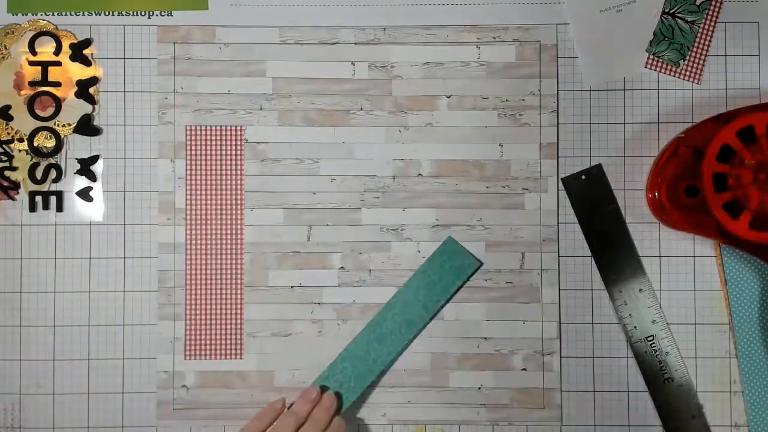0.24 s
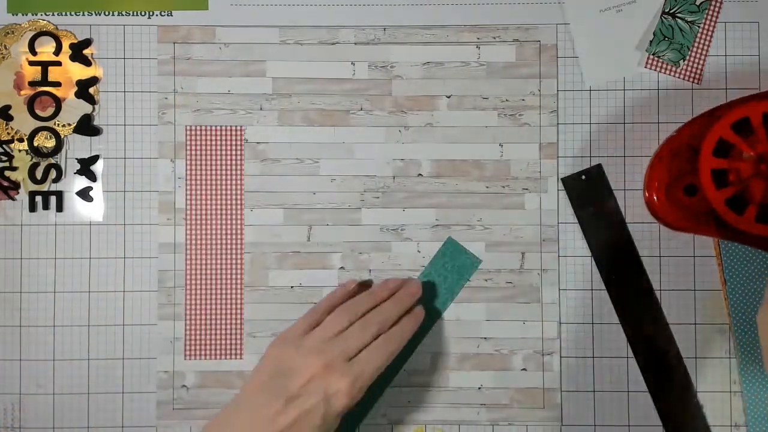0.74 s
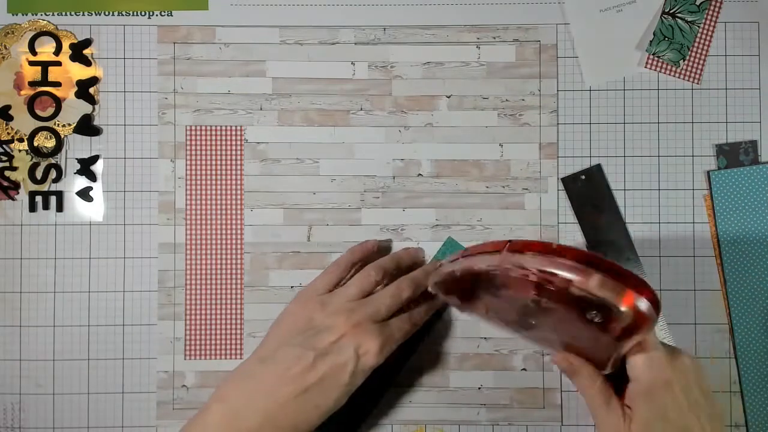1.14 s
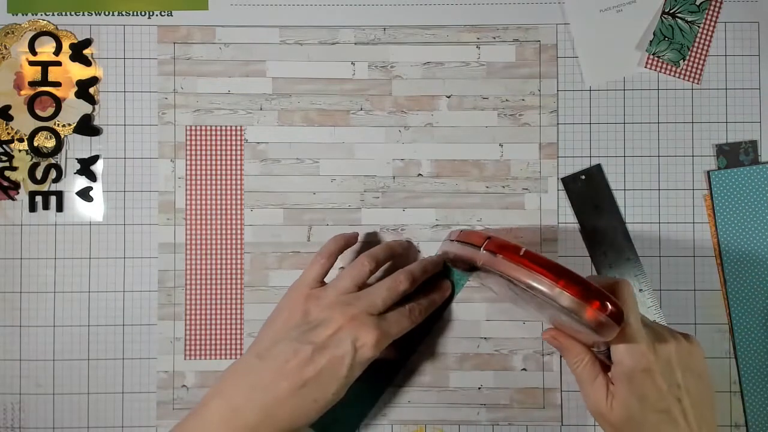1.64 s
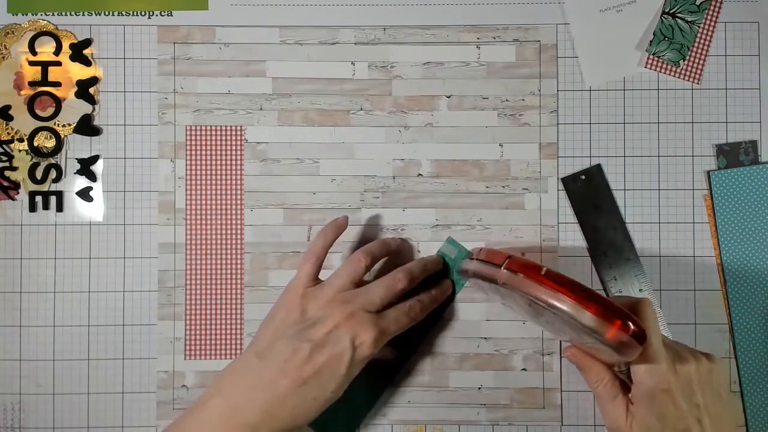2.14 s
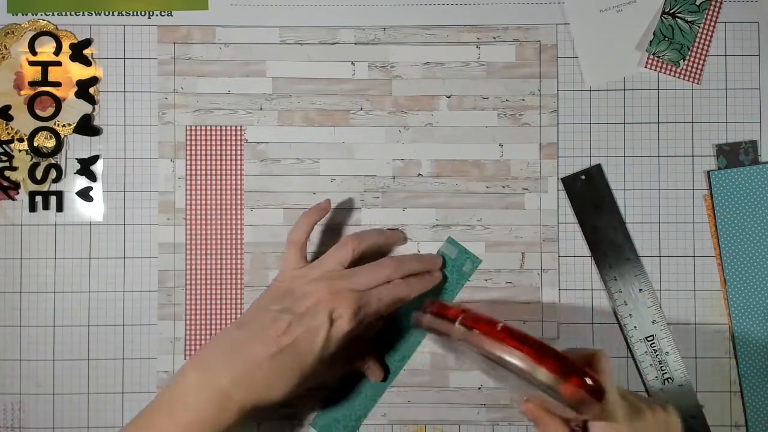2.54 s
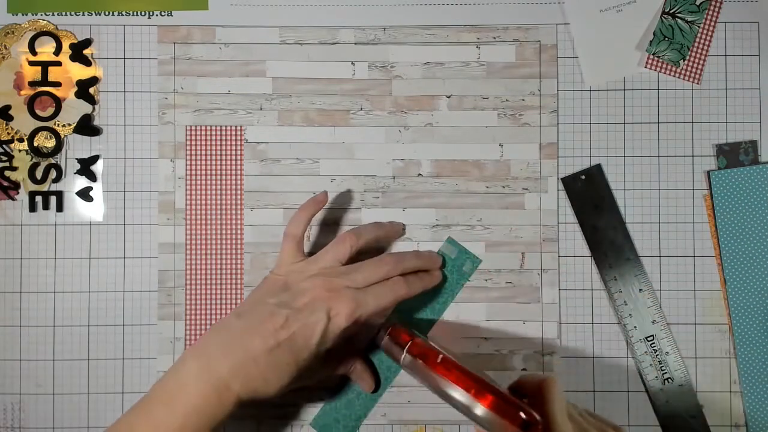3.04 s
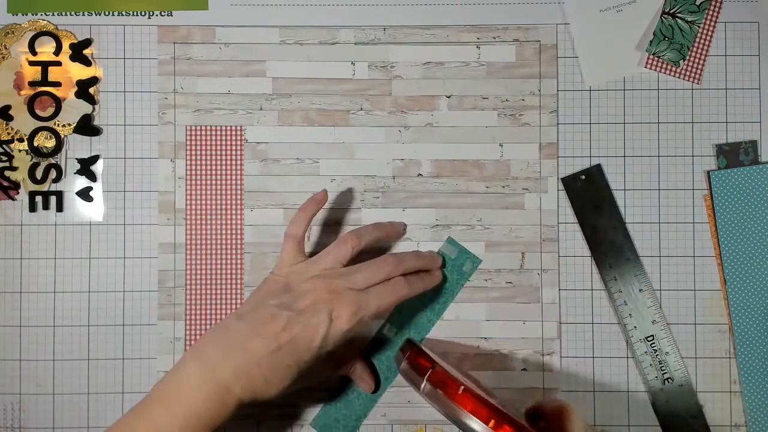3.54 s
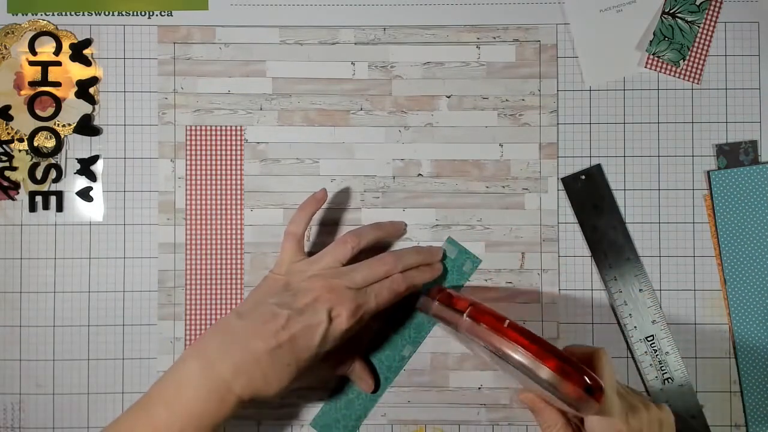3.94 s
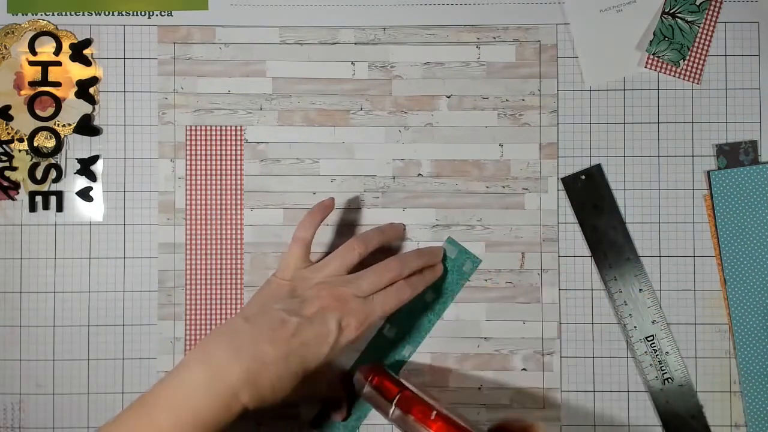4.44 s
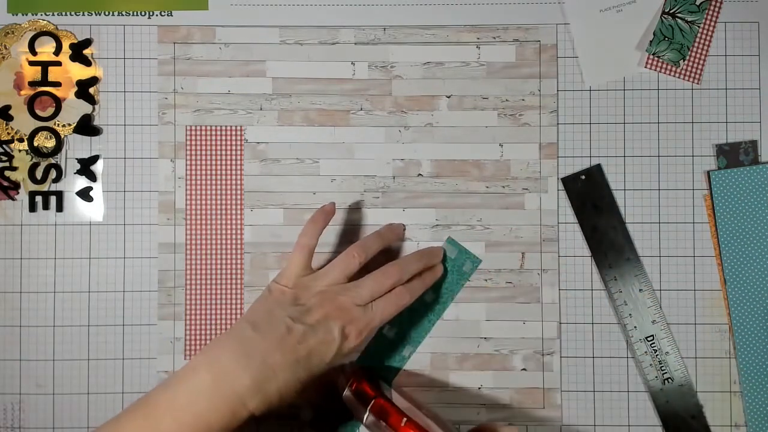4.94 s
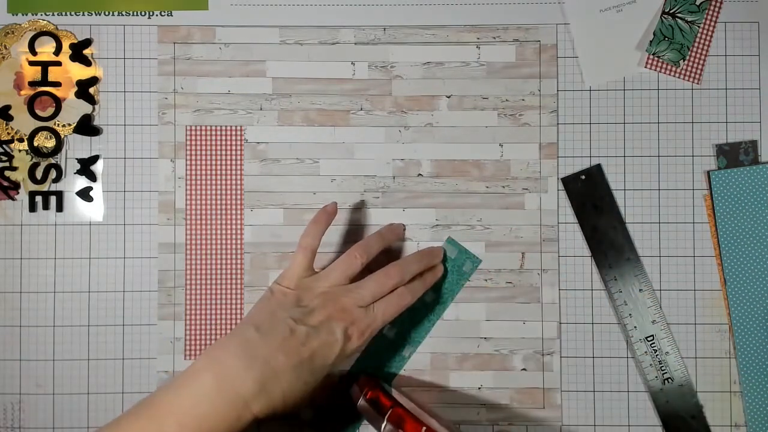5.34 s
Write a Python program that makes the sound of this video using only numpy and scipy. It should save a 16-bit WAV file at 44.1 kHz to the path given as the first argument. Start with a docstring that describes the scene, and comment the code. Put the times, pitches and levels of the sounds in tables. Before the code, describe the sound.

Close up in a small quiet room, a handheld tape runner is lifted with a rustle and a scatter of light plastic knocks. After a brief lull it is pushed over paper several times, each stroke giving a short cluster of sharp clicks and a soft thud on the table. Paper slides faintly between strokes, and everything has a slightly hollow colour.

```python
"""A rustle and light plastic knocks, close by: a tape runner is picked up from a craft table.
It is pressed along a paper strip in short strokes. Its ratchet snaps in bursts, the hollow shell
knocks and creaks, and paper slides. A small quiet room, in mono. Everything is heard twice,
the stronger copy 2.9 ms later, giving a hollow, comb-like colour."""
import sys
import numpy as np
from scipy import signal
from scipy.fft import rfft, irfft, next_fast_len
from scipy.io import wavfile
from scipy.ndimage import uniform_filter1d

SR = 44100
rng = np.random.default_rng(int(sys.argv[2]) if len(sys.argv) > 2 else 0)


def log_audio(samples):
    """Write samples as a 16-bit WAV file to the path given in sys.argv[1]."""
    # one column per channel
    frames = np.atleast_2d(samples).T
    # limit to full scale, then quantise
    limited = np.clip(frames, -1, 1)
    pcm = np.round(limited * 32767).astype(np.int16)
    wavfile.write(sys.argv[1], SR, pcm)


N = 246959
SIZE = 8192  # samples a blow may ring

# Modes of the plastic shell, its hollow and its bright crack. Each row: pitch in Hz, width in Hz, dB.
SHELL_MODES = [(1553, 430, 3.5), (1891, 230, -1.7), (2043, 530, -0.35), (2468, 230, -2.5),
               (2791, 530, 0.74), (3320, 380, 0), (3998, 1100, -1.5)]
HOLLOW_MODES = [(237, 77, -2), (333, 100, 2), (499.6, 130, 2.5), (658, 80, -6.5), (821.4, 160, -2),
                (1004, 88, -1.5), (1180, 190, -2)]
CRACK_MODES = [(3485, 300, -11.5), (4814, 2700, 0), (5050, 91, -5.5), (6000, 4800, -1.5), (9030, 9900, -7),
               (12750, 4900, -4.5)]
# Diffuse tails after high, middle and low modes. Each row: level in dB, time to fall 60 dB in ms.
TAILS = [(-33, 124), (-24.5, 83.5), (-30, 110.4)]
HIGH_TAIL, MID_TAIL, LOW_TAIL = TAILS


def ratchet():
    """Each sharp snap also rings the shell and its hollow; the hollow feels the longest push."""
    # Each row: start in seconds, contact in ms, level in dB.
    snaps = [(1.8113, 2.5, -18), (1.8253, 5, -21.5), (1.84, 5.5, -17.5), (1.8503, 3.2, -22),
             (1.8694, 3.5, -15.5), (1.8815, 0.54, -24), (2.234, 4.2, -22.5), (2.2563, 2.5, -15.5),
             (2.2729, 4.8, -22.5), (2.2856, 0.54, -10), (2.2988, .8, -9), (2.3067, 0.62, -19),
             (2.3136, 2.4, -33.5), (3.032, 3, -20), (3.0468, 2.3, -24), (3.0594, 1.6, -18),
             (3.0688, 3.8, -22), (3.0833, 1.7, -17.5), (3.6249, 2.2, -20), (4.12, 2.2, -16),
             (4.1385, 0.81, -16), (4.1507, 3.7, -18), (4.1628, 2, -20), (4.1693, 1.2, -26.5),
             (5.4582, 0.98, -30), (5.463, 0.96, -15), (5.4759, 1.7, -18.5), (5.4907, 5, -19.5),
             (5.4988, 3.2, -20)]
    # The ring of a snap. Each row: pitch in Hz, width in Hz, level in dB.
    snap_modes = [(4000, 1500, -8.5), (4684, 600, -5.5), (5374, 1200, 0), (6040, 1000, -3),
                  (7060, 2300, -6.5), (9400, 4700, -8), (11070, 3600, -10.5), (14500, 3000, -15.5)]
    out = np.zeros(N)
    for start, ms, db in snaps:
        body_db = 0.09 * (ms - 1)  # longer contacts pass more to the body
        strike(out, start, db, ms, snap_modes, HIGH_TAIL, grit_db=5)
        strike(out, start, body_db - 32, 0.44 * ms, SHELL_MODES, MID_TAIL, grit_db=2.7)
        strike(out, start, body_db - 37.5, 2.4 * ms, HOLLOW_MODES, LOW_TAIL,
               grit_db=5, peak_hz=880, db_per_octave=11)
    return out


def shell_knocks():
    """The tool knocks in the hand and on the paper: a crack, a ring, then a looser, softer bounce."""
    # Each row: start in seconds, crack, shell and hollow levels in dB, hollow peak in Hz.
    knocks = [(0.1148, -40, -33.5, -48.5, 660), (0.2069, -39.5, -47, -46.5, 1060),
              (0.2161, -52, -51.5, -42.5, 970), (0.2559, -34.5, -31.5, -45, 990),
              (0.2632, -19.5, -23.5, -37, 1080), (0.38, -59.5, -59, -82, 910), (0.417, -65, -61, -70, 900),
              (0.468, -54, -53, -60, 1200), (0.491, -63, -55, -61, 900), (0.5456, -56, -41, -39.5, 850),
              (0.5562, -47.5, -45, -44, 810), (0.5833, -40, -37.5, -48, 620), (0.614, -58, -38.5, -44, 850),
              (0.6523, -45.5, -34.5, -34.5, 776), (0.6826, -39.5, -32, -37, 850),
              (0.7011, -64, -56, -43, 850), (0.7279, -56, -44, -38, 850), (0.7392, -57, -39, -55, 920),
              (0.803, -57.5, -42.5, -53.5, 870), (0.8448, -76, -49, -50, 910),
              (0.8913, -39.5, -25, -27.5, 924), (0.918, -50.5, -70, -44, 840),
              (0.9622, -34.5, -37.5, -28.5, 820), (1.0018, -51, -42, -58, 860),
              (1.0113, -62, -61, -39, 825), (1.0501, -46, -44, -39, 826), (1.102, -60, -50.5, -52.5, 766),
              (1.1928, -67, -64, -49, 618), (1.2169, -77.5, -61.5, -48, 534),
              (1.246, -74, -64.5, -52.5, 616), (1.6679, -50, -51.5, -49.5, 715),
              (1.6808, -58, -48, -42.5, 684), (1.6903, -55.5, -54, -39.5, 660),
              (1.7875, -60, -40, -37, 714), (1.797, -35, -45.5, -45, 700), (1.9269, -60, -54, -47.5, 604),
              (2.0539, -43.5, -71, -70, 493), (2.113, -65.5, -55.5, -51, 426),
              (2.2989, -29.5, -29, -41.5, 820), (2.681, -64, -65.5, -41.5, 1000),
              (2.7175, -72, -85, -52, 962), (2.8812, -33.5, -46.5, -43.5, 1000),
              (2.987, -56.5, -52.5, -62.5, 890), (3.013, -47, -56, -52, 800),
              (3.0813, -53, -36, -25.5, 645), (3.1329, -60, -59, -50.5, 810), (3.17, -62, -60, -52, 970),
              (3.2816, -46, -47.5, -34.5, 589), (3.2928, -49.5, -38.5, -33, 912),
              (3.3038, -44, -42.5, -36, 924), (3.3674, -55, -56.5, -45.5, 950),
              (3.4428, -80, -86, -60, 680), (3.557, -61, -71, -70, 596), (3.574, -48, -57, -58, 555),
              (3.6514, -22, -28, -21.5, 635), (3.6643, -66, -67, -42, 670), (3.695, -69, -73, -47, 527),
              (3.7189, -66, -54, -47.5, 820), (3.748, -58.5, -58.5, -65.5, 900),
              (3.991, -62, -55, -48.5, 715), (4.008, -64.5, -46, -53, 695), (4.0366, -59.5, -55, -47, 975),
              (4.093, -77.5, -63, -53, 900), (4.1702, -57.5, -28.5, -39.5, 730),
              (4.2179, -61, -58, -46, 420), (4.29, -72, -68, -58, 810), (4.329, -71, -60.5, -50.5, 950),
              (4.7806, -77, -74, -58.5, 680), (5.055, -34, -38, -37, 946), (5.2605, -47, -44.5, -40, 723),
              (5.2752, -46, -39, -35, 687), (5.4248, -55, -49.5, -35, 595), (5.4384, -44, -47, -38, 498),
              (5.5226, -38, -38, -32.5, 620), (5.5794, -60, -63, -48, 750)]
    out = np.zeros(N)
    scatter = rng.standard_normal((len(knocks), 2))
    for (start, crack_db, shell_db, hollow_db, hollow_hz), (spot, wait) in zip(knocks, scatter):
        shell_hz = 1940 * 2 ** (0.42 * spot)
        dullness_db = max(hollow_db, shell_db) - crack_db - 10.5
        contact_ms = np.clip(2.24 * undb(0.08 * dullness_db), .2, 6)  # brighter knocks are shorter
        bounce = start + 0.011 * undb(3 * wait)
        strike(out, start, crack_db, contact_ms, CRACK_MODES, HIGH_TAIL, grit_db=2.7)
        for at, ms, db in (start, contact_ms, 0), (bounce, 3.6, -12):
            strike(out, at, shell_db + db, ms, SHELL_MODES, MID_TAIL,
                   grit_db=7.2, peak_hz=shell_hz, db_per_octave=12)
            strike(out, at, hollow_db + db, ms, HOLLOW_MODES, LOW_TAIL,
                   grit_db=8.3, peak_hz=hollow_hz, db_per_octave=21)
    return out


def table_thumps():
    """Dull pushes ring the low modes of the table top."""
    # Each row: start in seconds, level in dB.
    pushes = [(0.257, -57), (0.585, -61), (0.654, -54), (1.675, -59.5), (1.83, -48.5), (1.869, -59),
              (2.241, -55.5), (2.29, -49.5), (3.039, -51), (3.072, -59), (3.282, -50), (3.36, -67),
              (3.65, -57.5), (4.145, -48.5), (5.269, -59), (5.47, -53)]
    # Each row: pitch in Hz, width in Hz, level in dB.
    board_modes = [(44.8, 140, -7), (95, 110, -3.5), (140, 120, -1), (208, 33, 3)]
    out = np.zeros(N)
    for start, db in pushes:
        strike(out, start, db, contact_ms=3.3, modes=board_modes, tail=LOW_TAIL,
               grit_db=2.9, peak_hz=75, db_per_octave=5.4)
    return out


def friction():
    """Fibres catch at random: a fine hiss, and a duller scrape in the shell and its hollow."""
    # Slides over paper. Each row: start, length and swell in seconds, hiss, scrape and fade in dB.
    slides = [(2.396, 0.053, .01, -56, -75, 0), (2.446, .19, 0.045, -50.5, -67.5, -6),
              (2.65, 0.15, 0.023, -64.5, -58, -22), (3.873, 0.096, 0.019, -65, -66, 6.5),
              (4.244, 0.37, 0.013, -48, -64.5, -17.5)]
    # Hiss and scrape rise just before sharp snaps and knocks. Each row: end in seconds, level in dB.
    swells = [(1.81, -47.5), (2.235, -50.5), (2.88, -68), (3.03, -53), (3.628, -52), (4.12, -57)]
    # Strip and tool turn in the hands. Each row: time in seconds, hiss and scrape in dB.
    handling = [(0, -45, -65.5), (.062, -46.5, -62.5), (0.08, -55, -85), (0.13, -51, -51.5),
                (0.266, -53.5, -57.5), (0.37, -61, -69), (.47, -69.5, -66), (0.535, -68, -70),
                (0.602, -45, -43.5), (.72, -57, -55.5), (0.8, -63.5, -70), (.97, -55.5, -57),
                (1.1, -59.5, -65), (1.3, -104.5, -80)]
    # Each row: pitch in Hz, width in Hz, level in dB.
    paper_modes = [(4970, 2500, 2), (6920, 3400, 3.5), (9300, 4700, 0), (14300, 4200, -10)]
    t = np.arange(N) / SR
    paper, shell, hollow = np.zeros((3, N))
    for start, length, swell, hiss_db, scrape_db, fade_db in slides:
        edges = np.clip(np.minimum((t - start) / swell, (start + length - t) / 0.045), 0, 1)
        stroke = edges * undb(fade_db * np.clip((t - start) / length, 0, 1))
        paper += undb(hiss_db) * stroke
        shell += undb(scrape_db) * stroke
        hollow += undb(scrape_db - 2) * stroke
    for end, db in swells:
        rise = undb(db + 373 * np.minimum(t - end, 0)) * (t < end)  # 373 dB a second
        paper += rise
        shell += rise
        hollow += undb(3.5) * rise
    times, *levels = np.transpose(handling)
    hand_hiss, hand_scrape = (undb(np.interp(t, times, db, -120, -120)) for db in levels)
    return (rub(paper, paper_modes, flicker_db=.6)
            + rub(shell + hand_scrape, SHELL_MODES, flicker_db=2)
            + rub(hollow + hand_scrape, HOLLOW_MODES, flicker_db=2)
            + rub(hand_hiss, CRACK_MODES, flicker_db=1.5))


def room_tone():
    """The room's faint, low noise, wavering slightly."""
    # Each row: frequency in Hz, relative noise density in dB.
    spectrum = [(15, -44), (25, -17), (123, -4), (194, -2.5), (283, -6), (901, -9), (1030, -9), (1250, -13),
                (1350, -13.5), (1920, -16.5), (15700, -30.5)]
    hz, db = np.transpose(spectrum)
    size = next_fast_len(N)
    freqs = np.arange(size // 2 + 1) * SR / size + 1
    colour = undb(np.interp(np.log(freqs), np.log(hz), db))
    noise = irfft(rfft(rng.standard_normal(size)) * colour, size)[:N]
    return unit(noise * undb(.8 * walk(36))) * undb(-66)


def strike(out, start, db, contact_ms, modes, tail, grit_db, peak_hz=1000, db_per_octave=0):
    """Add a blow to out: a gritty burst of tiny impacts rings the modes, less so away from peak_hz."""
    ms = np.arange(SIZE) * 1000 / SR
    burst = int(contact_ms * 3 * SR / 1000) + 40  # samples
    blow = np.sqrt(ms / contact_ms) * np.exp(-ms / contact_ms)
    blow *= undb(grit_db * rng.standard_normal(SIZE))
    force = unit(blow, burst) * rng.choice([-1, 1], size=SIZE)
    # loose parts and nearby walls scatter a tail; the far walls answer more faintly and longer
    tail_db, t60_ms = tail
    near = undb(tail_db - 60 * ms / t60_ms)
    far = undb(tail_db - 21 - 60 * ms / 290)
    force += np.sqrt(burst) * rng.standard_normal(SIZE) * (near + far) * np.clip(ms / 4.4, 0, 1)
    octaves = np.abs(np.log2(np.array(modes)[:, 0] / peak_hz))
    # no two blows land on quite the same spot
    shares = undb(-db_per_octave * octaves + 1.5 * rng.standard_normal(len(modes)))
    sound = irfft(rfft(force) * (shares @ mode_spectra(modes)), SIZE)
    sound = undb(db) * unit(sound, burst + int(2 * SR / peak_hz))
    first = int(start * SR)
    out[first:first + SIZE] += sound[:N - first]


def rub(envelope, modes, flicker_db):
    """Uneven friction noise keeps the modes ringing, as loud as the smoothed envelope."""
    fibres = rng.standard_normal(N) * undb(flicker_db * (walk(130) + walk(26)))
    ringing = sum((-1) ** k * undb(db) * resonate(fibres, hz, width) / np.sqrt(width)
                  for k, (hz, width, db) in enumerate(modes))
    return uniform_filter1d(envelope, 300) * unit(ringing)


def mode_spectra(modes):
    """Each mode's answer to a click, as a spectrum; neighbours swing in opposite sign."""
    click = signal.unit_impulse(SIZE)
    return np.array([(-1) ** k * undb(db) * rfft(unit(resonate(click, hz, width)))
                     for k, (hz, width, db) in enumerate(modes)])


def resonate(x, hz, width):
    """A two-pole resonance applied twice for steep skirts; gain 1 at the centre."""
    b, a = signal.iirpeak(hz, hz / width, fs=SR)
    return signal.lfilter(b, a, signal.lfilter(b, a, x))


def walk(rate):
    """Random levels held 1 / rate seconds and slewed; spread near 1."""
    hold = int(SR / rate)
    steps = np.repeat(rng.standard_normal(N // hold + 1), hold)
    return 1.1 * uniform_filter1d(steps, hold)[:N]


def undb(db):
    """Decibels to amplitude."""
    return 10 ** (np.asarray(db) / 20)


def unit(x, head=None):
    """Scale to RMS 1, overall or across the first head samples."""
    return x / np.sqrt(np.mean(x[:head] ** 2))


def scene():
    """Tool, table and paper up close over the room tone, in mono."""
    return (ratchet() + shell_knocks() + table_thumps() + friction() + room_tone())[None]


def record(dry):
    """Two copies and a faint third give a comb-like colour; clipped at full scale, cut at 15.8 kHz."""
    lag = 128  # samples between copies
    taps = np.zeros(2 * lag + 1)
    taps[::lag] = 0.56, 0.93, 0.011
    doubled = signal.lfilter(taps, [1], dry)
    lowpass = signal.ellip(10, .2, 60, 15800, fs=SR, output="sos")
    return signal.sosfilt(lowpass, np.clip(doubled, -1, 1))


dry = scene()
out = record(dry)
log_audio(out)
```